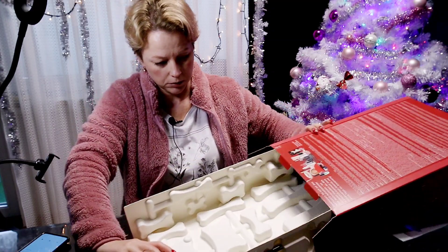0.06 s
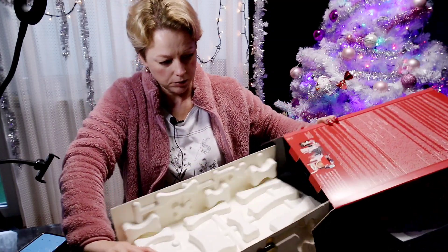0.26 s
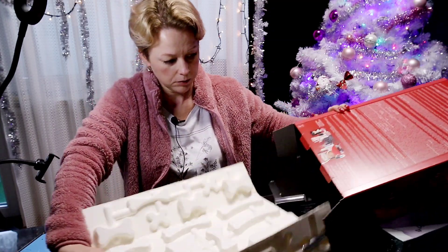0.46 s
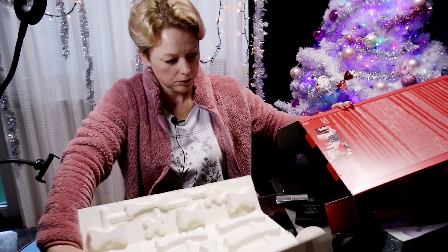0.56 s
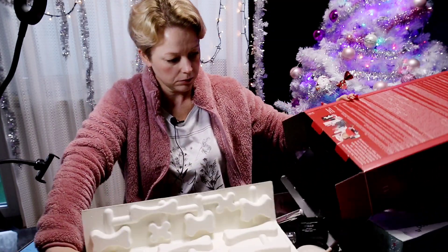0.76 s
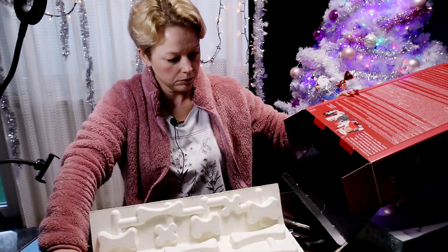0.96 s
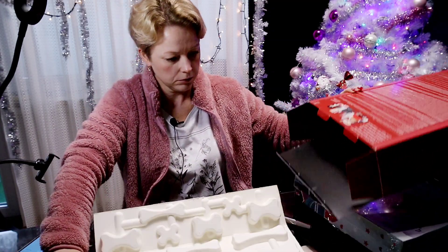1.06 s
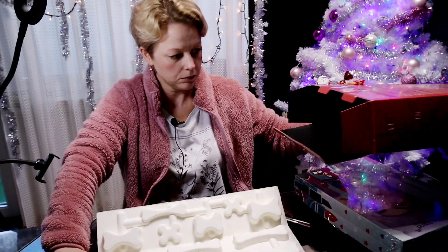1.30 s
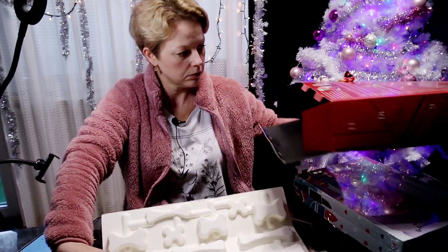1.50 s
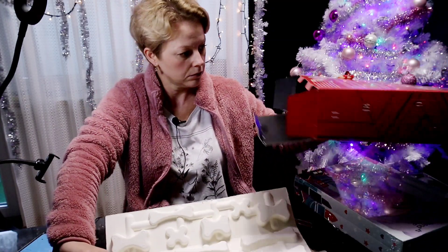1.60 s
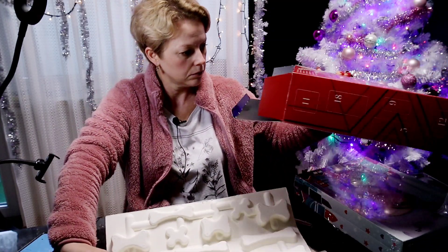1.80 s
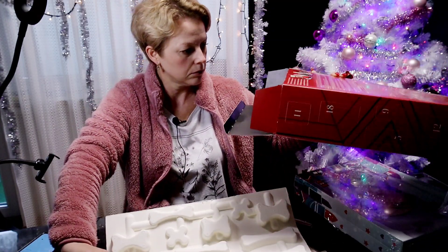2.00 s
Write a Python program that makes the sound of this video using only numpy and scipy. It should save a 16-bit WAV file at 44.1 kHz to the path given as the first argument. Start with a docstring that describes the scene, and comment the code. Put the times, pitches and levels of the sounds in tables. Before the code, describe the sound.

A molded tray is pulled from a cardboard box close to a clip-on microphone in a small quiet room, scraping, knocking and crackling for a second, then only faint bumps, soft sleeve rubbing and low room tone.

```python
"""A moulded plastic tray is pulled out of a cardboard box near a clip-on microphone, in a small quiet room.
First the tray scrapes by stick-slip friction, loose parts knock as short pressure swings that excite the modes
of the hollow box, and thin plastic crackles in noise bursts; from about 1 s all this grows faint.
From 1.2 s, as the box is lifted away, a sleeve rubs it, heard as noise through resonances of the board.
Room tone and microphone hiss, as steady coloured noise, last throughout."""
import sys
import numpy as np
from scipy import signal
from scipy.fft import rfft, irfft
from scipy.io import wavfile
from scipy.ndimage import uniform_filter1d

SR = 44100
rng = np.random.default_rng(int(sys.argv[2]) if len(sys.argv) > 2 else 0)


def inscribe(sig):
    """Save sig as 16-bit PCM at rate SR to the path in sys.argv[1].

    A 1-D sig is mono; a 2-D sig holds one channel per row.
    Samples are clipped to [-1, 1] before scaling.
    """
    pcm = np.round(np.clip(np.atleast_2d(sig).T, -1, 1) * 32767)
    wavfile.write(sys.argv[1], SR, pcm.astype(np.int16))


N = 90404
T = np.arange(N) / SR


def undb(db):
    """Decibels to an amplitude ratio."""
    return 10 ** (np.asarray(db) / 20)


def unit(x):
    """Scale to an rms of 1."""
    return x / np.sqrt(np.mean(x ** 2))


def band(x, lo_hz, hi_hz, order=3):
    """Butterworth band-pass."""
    return signal.sosfilt(signal.butter(order, [lo_hz, hi_hz], "band", fs=SR, output="sos"), x)


def colour(x, table):
    """Spectral shaping: gains interpolated over log frequency."""
    hz, db = np.array(table).T
    f = np.maximum(np.arange(len(x) // 2 + 1) * SR / len(x), 1)
    gain = undb(np.interp(np.log(f), np.log(hz), db))
    return irfft(rfft(x) * gain, len(x))


def add(out, s, x):
    """Superposition: mix x in at s seconds."""
    i = max(int(s * SR), 0)
    out[i:i + len(x)] += x[:N - i]


def fade(t, t60):
    """Exponential decay, 60 dB in t60 seconds."""
    return np.exp(-np.log(1000) * t / t60)


def walk(rate):
    """Slow random modulation: smoothed random steps, rate per second, rms 1."""
    k = int(SR / rate)
    steps = np.repeat(rng.standard_normal(N // k + 1), k)
    return unit(uniform_filter1d(steps, k)[:N])


def grains(per_s, spread_db):
    """Stick-slip friction: random tiny slips of uneven size over a thin bed of noise."""
    chance, sign, size = rng.random((3, N))
    slips = (chance < per_s / SR) * np.sign(sign - .5) * undb(-spread_db * np.log(size + 0.026))
    return unit(slips + 0.15 * rng.standard_normal(N))


# Spectrum of the room tone and hiss. Each row: frequency in Hz, relative level in dB.
ROOM_COLOUR = [(15, -34), (25, 6.5), (138, -11.5), (159, -20.5), (296, -28), (510, -44.5), (1250, -59.5),
               (3060, -62), (5270, -42), (6040, -49), (13300, -53), (16500, -64)]
ROOM_DB = -62


def room():
    """Stationary coloured noise: steady room tone and microphone hiss."""
    return undb(ROOM_DB) * unit(colour(rng.standard_normal(N), ROOM_COLOUR))


# Faint rubbing of a sleeve on the box as it is lifted. Each row: time in seconds, level in dB.
SLEEVE_LEVEL = [(1.2, -78.5), (1.335, -58.5), (1.365, -66), (1.44, -56.5), (1.499, -72), (1.58, -78.5),
                (1.68, -76), (1.76, -80), (1.85, -88), (1.92, -91.5), (1.979, -78.5), (2.05, -71)]
# Resonances of the rubbed glossy board. Each row: frequency in Hz, width in Hz, level in dB.
RUBBED_MODES = [(2500, 370, -2), (3510, 300, -1.5), (4380, 420, -4), (5830, 230, -6)]
RUBBED_PLAIN_DB = -2  # rubbing without the resonances


def sleeve():
    """Friction noise through resonances: each one swells on its own as the rubbing varies."""
    s, db = np.array(SLEEVE_LEVEL).T
    rub = grains(3000, 2.57)
    patches = sum(undb(level_db + 3.2 * walk(35.2)) * unit(band(rub, f - width / 2, f + width / 2, order=2))
                  for f, width, level_db in RUBBED_MODES)
    plain = undb(RUBBED_PLAIN_DB) * unit(band(rub, 1300, 7000, order=2))
    level = undb(np.interp(T, s, db)) * (T > s[0]) * undb(1.2 * walk(40.56))
    return level * unit(unit(patches) + plain)


# Course of the handling. Each row: time in seconds, then levels in dB of the scrape, the rustle, the rumble,
# the gritty upper part of the scrape and the hollow lower part of the scrape.
HANDLING_LEVELS = [(0.0, -42, -51.5, -52, -45.5, -58), (0.05, -35.5, -48.5, -54.5, -44, -39),
                   (0.09, -38, -52, -50, -39, -41), (0.17, -34.5, -54, -56, -45.5, -37),
                   (0.23, -35, -52, -34.5, -42, -32.5), (0.302, -34.5, -53, -44, -46, -40.5),
                   (0.321, -16.5, -54, -31, -29, -32), (0.35, -24, -52, -41.5, -27.5, -28.5),
                   (0.43, -39, -47, -36.5, -35, -37), (0.47, -23, -54, -44.5, -40, -36.5),
                   (0.58, -38, -55, -46, -55, -32.5), (0.62, -35, -50, -54, -44, -38),
                   (0.661, -37, -59, -44, -52.5, -41), (0.78, -27.5, -56.5, -41.5, -37.5, -43),
                   (0.86, -35.5, -55, -65, -44.5, -45), (0.92, -34, -51, -39.5, -41.5, -34),
                   (1.03, -46, -65.5, -71, -58, -38.5), (1.15, -60, -72, -52.5, -67, -43.5),
                   (1.17, -59.5, -70.5, -72, -69, -48.5), (1.37, -53.5, -68.5, -64, -64, -53.5),
                   (1.48, -62.5, -67.5, -44, -68, -76), (1.57, -64.5, -70.5, -67.5, -72.5, -65.5),
                   (1.71, -85, -73.5, -67, -81, -68), (2.05, -77.5, -72.5, -67.5, -83, -76)]
# Modes of the box, also used by the knocks. Each row: frequency in Hz, level in dB, 60 dB decay time in seconds.
BOX_MODES = [(93, -16.5, 0.036), (177.6, -4.5, .12), (228.7, -5, 0.16), (398.4, -13, 0.11),
             (509, -19.5, 0.073), (741, -12, 0.059), (874.4, -17, 0.082), (1130, -14, 0.022),
             (1160, -17, 0.087), (1300, -23, 0.021), (1510, -11, 0.021), (1745, -17.5, 0.054),
             (2330, -21, .025), (3426, -23, 0.012)]
# Colour of the scrape and of the rattling tails of knocks. Each row: frequency in Hz, relative level in dB.
BOARD_COLOUR = [(59, -43.5), (100, -14.5), (228, 3.5), (270, -4), (337, 6.5), (492, 0.5), (1100, 4.5),
                (1580, -1.5), (2380, -5.5), (6000, -38.5), (7800, -56)]
# Colour of thin plastic in rustle and crackles. Each row: frequency in Hz, relative level in dB.
FILM_COLOUR = [(2940, -31.5), (5000, 1), (6480, -2), (7530, 1), (8580, -3), (10200, -11), (11200, -8.5),
               (13000, -0.5), (13600, 1), (15400, -9), (16500, -22.5)]
GRAINS_PER_S, GRAIN_DB = 1900, 4.5
BODY_DB = -5.5  # slips heard through the modes of the box


def handling():
    """Stick-slip friction: tray on board excites the box modes, plastic rustles, the moving box rumbles."""
    s, *levels = np.array(HANDLING_LEVELS).T
    scrape, rustle, rumble, grit, hollow = (undb(np.interp(T, s, db)) for db in levels)
    slips = colour(grains(GRAINS_PER_S, GRAIN_DB), BOARD_COLOUR)
    # the Q of each resonance follows from its frequency and decay time
    body = sum(undb(level_db) * signal.lfilter(*signal.iirpeak(f, f * t60 / 20.0, fs=SR), slips)
               for f, level_db, t60 in BOX_MODES)
    slips = unit(slips) + undb(BODY_DB) * unit(body)
    scraping = scrape * undb(0.4 * walk(40)) * unit(band(slips, 650, 2100))
    hollow_part = hollow * undb(0.96 * walk(32)) * unit(band(slips, 200, 620))
    gritty_part = grit * undb(2.0 * walk(50)) * unit(band(grains(4000, 0.83), 1700, 4600, order=4))
    film = colour(grains(5600, 2.1), FILM_COLOUR)
    rustling = rustle * undb(1.1 * walk(33)) * unit(band(film, 5000, .45 * SR))
    low_noise = unit(band(rng.standard_normal(N), 59, 140, order=4))
    rumbling = rumble * undb(2.0 * walk(12.0)) * low_noise
    return scraping + hollow_part + gritty_part + rustling + rumbling


# Crackles of thin plastic. Each row: start in seconds, level in dB, middle band relative to the bright band
# in dB, decay time constant in ms.
CRACKLE_EVENTS = [(0.0194, -31, 19.5, 1.35), (0.081, -29, -6, 3.4), (0.136, -24, 1.5, 3.3),
                  (0.177, -30.5, 3, 2.2), (0.1947, -22, 8, 1.4), (0.2053, -14.5, -3, 1.9),
                  (0.227, -29.5, 7, 2.0), (0.2743, -22, 1, 3.2), (0.3129, -6, -1, 2.7),
                  (0.3155, 1.5, -7.5, 1.7), (0.3382, -35, 22.5, 2.5), (0.348, -32, 21, 2.4),
                  (0.3848, -13.5, 1, 1.1), (0.394, -10, -14, 0.58), (0.4045, -31.5, 3, 2.0),
                  (0.4166, -23, 3.5, 1.3), (0.482, -16, 5.5, 1.1), (0.4948, -19.5, 4.5, 1.7),
                  (0.5322, -23, 2, 0.81), (0.5485, -20.5, 3, 3.3), (0.561, -15, -5, 0.94),
                  (0.5652, -14, -2, 1.8), (0.6055, -28.5, -8, 2.6), (0.622, -25.5, -17, 1.3),
                  (0.7087, -34, -2, 2.6), (0.7641, -8, 4, 1.44), (0.81, -12, -4, 2.7),
                  (0.8187, -21, -14, 3.2), (0.8382, -21, -2, 3.9), (0.8826, -33, 14, 4.8),
                  (0.892, -26, 2.5, 6.9), (0.932, -19, -22, 2.6), (0.9613, -21.5, -3, 2.6),
                  (1.0772, -40, 2, 2.2), (1.125, -41, -29, 2.2), (1.236, -45.5, -18, 11),
                  (1.269, -43, -19, 2.4), (1.331, -43, 4, 9.5), (1.378, -33.5, -3.5, 3.2),
                  (1.4127, -57, 7, 5.5), (1.4343, -39.5, 2, 7.5), (1.609, -42, -14.5, 3.4),
                  (1.6366, -53.5, -4, 1.8), (1.663, -47, -2.5, 2.1), (1.947, -49, -2.5, 3.2),
                  (2.0343, -45, -2, 1.83)]
CRACK_RISE_S, CRACK_TAIL_DB, CRACK_T60_S = 0.0015, -26, 0.18
CRACKLE_GAIN_DB = -12.5  # applied to all crackles


def crackles():
    """Impulsive noise: bursts in two bands with a quick rise, a decay of milliseconds and a faint tail."""
    t = np.arange(SR // 10) / SR
    after = np.maximum(t - CRACK_RISE_S, 0)
    bright_gate, middle_gate = np.zeros((2, N))
    for s, db, middle_db, decay_ms in CRACKLE_EVENTS:
        rise = np.clip(t / CRACK_RISE_S, 0, 1) ** 2
        decay = np.exp(-after * 1000 / decay_ms) + undb(CRACK_TAIL_DB) * fade(t, CRACK_T60_S)
        add(bright_gate, s, undb(db) * rise * decay)
        add(middle_gate, s, undb(db + middle_db) * rise * decay)
    noise = rng.standard_normal((2, N))
    bright = unit(band(colour(noise[0], FILM_COLOUR), 5000, 17000))
    middle = unit(band(noise[1], 1800, 5300, order=4))
    return undb(CRACKLE_GAIN_DB) * (bright_gate * bright + middle_gate * middle)


# Knocks of loose parts. Each row: time in seconds, level in dB, pitch of the contact in Hz, then levels in dB
# relative to the contact: ring of the box, rattling tail, bright bite, thump of the big panels.
KNOCK_EVENTS = [(0.024, -20, 1110, -3.5, -30, -15, -29), (0.1024, -19, 1700, -3.5, -25, -19, -40),
                (0.1413, -17.5, 1550, -2.5, -15, -15, -27), (0.1802, -15, 1300, 0.5, -11, -17, -13.5),
                (0.2081, -12.5, 1700, -7, -27, -27, -27.5), (0.209, -16, 400, 9.5, -22, -33, -9.5),
                (0.2403, -17.5, 1150, -13, -14, -22, -14), (0.3129, -22, 570, 21, -3.5, -21, 6.5),
                (0.3192, -6.5, 433, 5.5, -7.5, -6, -17.5), (0.328, -12.5, 607, -1, -30, -14, -12),
                (0.3847, -13, 1530, -2, -35, -20, -17), (0.3957, 1, 1050, 1, -19, -30, -20),
                (0.4025, -2, 724, -2.5, -39, -44, -13.5), (0.405, -4.5, 714, -16.5, -36.5, -38, -10.5),
                (0.4129, 1.5, 1700, -8.5, -26, -16, -27), (0.4176, -2.5, 1600, -13.5, -16, -11.5, -24),
                (0.43, -16, 750, 0, -15, -8, -27), (0.4343, -11, 842, -3, -28, -21.5, -19.5),
                (0.446, -12, 1180.0, -17, -6.5, -11, -32), (0.4962, -3.5, 1340, -7.5, -24, -52, -25),
                (0.5358, 2, 1405, -14, -17.5, -17.5, -34), (0.5726, -18.5, 1230, 7, -18, -21, -16),
                (0.6054, -20.5, 1320, -14, -9, -12.5, -21), (0.6868, -38, 1170, -4, 6.5, -27, -15),
                (0.697, 3.5, 1434, -7.5, -14, -26, -24), (0.7066, -19, 410, -35, -34, -20, -6.5),
                (0.7118, -14, 800, -1, -23, -17, -11), (0.7383, -16, 1090, -18, -15.5, -29, -10.5),
                (0.7655, -6, 3700, -32, -17.5, -10, -37), (0.8097, -5, 870, -2, -14, -25, -22),
                (0.8159, -2, 1290, -6, -35, -28, -21.5), (0.9222, -18.5, 1220, 1, -10.5, -12, -17),
                (0.9345, -15.5, 2000, -2, -25, -25, -21), (0.9821, -17, 990, -3, -43, -37, -14.5),
                (1.0219, -26, 820, 5, -19, -8.5, -39), (1.0458, -24.5, 1040, 3.5, -41, -38.0, -10),
                (1.079, -42, 2500, -1, -23, -22, -26), (1.0864, -27, 400, -4, -27, -33, -17.5),
                (1.1003, -24, 1060, -2.5, -32, -35, -33), (1.11, -35, 525, -4, -29, -37, -25),
                (1.151, -30.5, 710, 8, -34, -22.5, -12), (1.2005, -34.5, 1226, -5, -21, -32, -5),
                (1.2147, -40.5, 1350, 4, -10.5, -11, -4), (1.2426, -30, 396, -18, -22, -26, -32),
                (1.2485, -31.5, 430, -28, -33, -18, -35), (1.2625, -38.5, 1300.0, -2, -4, -10.5, -12),
                (1.2745, -47, 1300, -4, -34, -14, -28), (1.2984, -31.5, 475, -3, -20, -16, -35),
                (1.381, -42.0, 555, 6.5, -36, -13, 1), (1.4376, -36, 460, 0, -19, -21, -8),
                (1.4534, -38, 720, 2, -7.5, -8, -12.5), (1.4742, -29, 1350, -6.5, -15.5, -13, -21),
                (1.5043, -45, 1500, -4, -8.5, -1.5, -12), (1.7303, -52.5, 600, -5.5, -20.5, -8.5, -7.5),
                (1.7966, -47, 515, 4, -19, -17.5, 0), (1.996, -56, 1770.0, -11, -20, -14, -7.5)]
LEAD_S = .004  # the contact swing starts this long before its centre
RISE_CYCLES, CYCLES = 0.28, 0.85  # Gaussian widths before and after the centre, in cycles of the contact pitch
PANEL_HZ = 300  # modes below this are the big panels
REACH = 1.3  # modes above this multiple of the contact pitch are excited less
NEAR_DB, NEAR_OCTAVES = 5.5, 0.18  # modes close to the contact pitch ring louder
TAIL_T60_S, TAIL_RISE_S = 0.16, 0.0023
BITE_T60_S, BITE_RISE_S = 0.0093, .001
KNOCK_LOW_HZ = 90  # lower edge of the knocks' band


def box_ring(after, hz, ring_db, thump_db, chance):
    """Modal synthesis: decaying sines, each varied a little in level and pitch, excited up to about hz."""
    ring = np.zeros(len(after))
    for k, (f, mode_db, t60) in enumerate(BOX_MODES):
        level_chance, pitch_chance = chance[2 * k:2 * k + 2]
        near_db = NEAR_DB * np.exp(-(np.log2(f / hz) / NEAR_OCTAVES) ** 2)
        part_db = thump_db if f < PANEL_HZ else ring_db
        level = undb(mode_db + 1.6 * level_chance + near_db + part_db) / np.sqrt(1 + (f / (REACH * hz)) ** 4)
        tone = np.sin(2 * np.pi * f * (1 + 0.0093 * pitch_chance) * after)
        ring += (-1) ** k * level * tone * fade(after, t60)
    return ring


def knocks():
    """Impact excitation: a short pressure swing at the contact, then box modes, rattle and bright bite."""
    out = np.zeros(N)
    u = np.arange(SR // 4) / SR - LEAD_S
    after = np.maximum(u, 0)
    chance = rng.standard_normal((len(KNOCK_EVENTS), 2 * len(BOX_MODES)))
    rattle = unit(colour(grains(2500, 5.5), BOARD_COLOUR))
    bite = unit(band(rng.standard_normal(N), 2400, 4000, order=4))
    for (s, db, hz, ring_db, tail_db, bite_db, thump_db), c in zip(KNOCK_EVENTS, chance):
        width = np.where(u < 0, RISE_CYCLES, CYCLES)
        contact = -np.cos(2 * np.pi * hz * u) * np.exp(-.5 * (u * hz / width) ** 2)
        ring = box_ring(after, hz, ring_db, thump_db, c)
        i = int(s * SR)
        tail = band(np.resize(rattle[i:], len(u)), 290, 800 + 2 * hz, order=2)
        tail *= fade(after, TAIL_T60_S) * np.clip(u / TAIL_RISE_S, 0, 1)
        sharp = np.resize(bite[i:], len(u)) * fade(after, BITE_T60_S)
        sharp *= np.clip(1 + u / BITE_RISE_S, 0, 1) ** 2
        add(out, s - LEAD_S, undb(db) * (contact + ring + undb(tail_db) * tail + undb(bite_db) * sharp))
    return band(out, KNOCK_LOW_HZ, 9000, order=2)


def scene():
    """Linear superposition of all sources, as one channel."""
    return (room() + sleeve() + handling() + crackles() + knocks())[None]


TOP_HZ = 16500


def record(dry):
    """Soft saturation rounds the loudest peaks; an elliptic low-pass cuts the top."""
    rounded = np.tanh(0.52 * dry) / 0.66
    return signal.sosfilt(signal.ellip(10, .2, 70, TOP_HZ, fs=SR, output="sos"), rounded)


dry = scene()
out = record(dry)
inscribe(out)
```